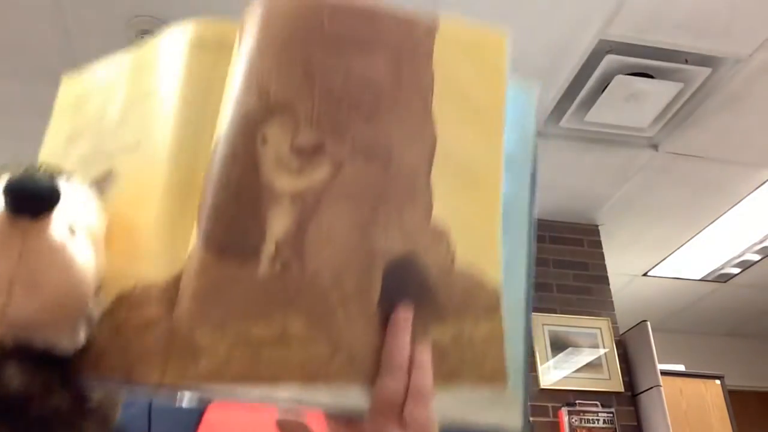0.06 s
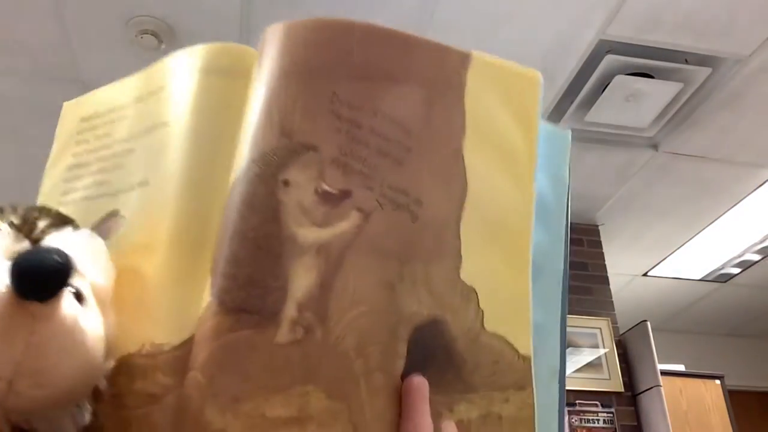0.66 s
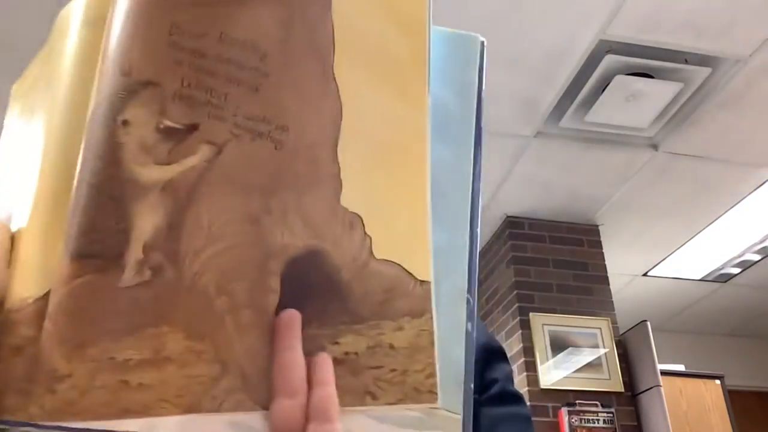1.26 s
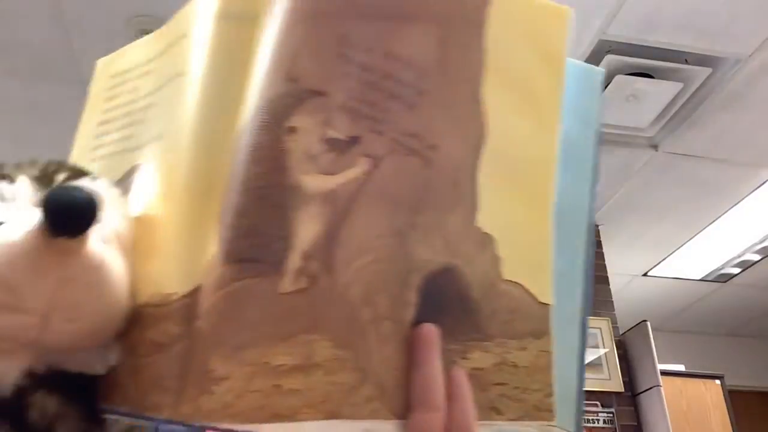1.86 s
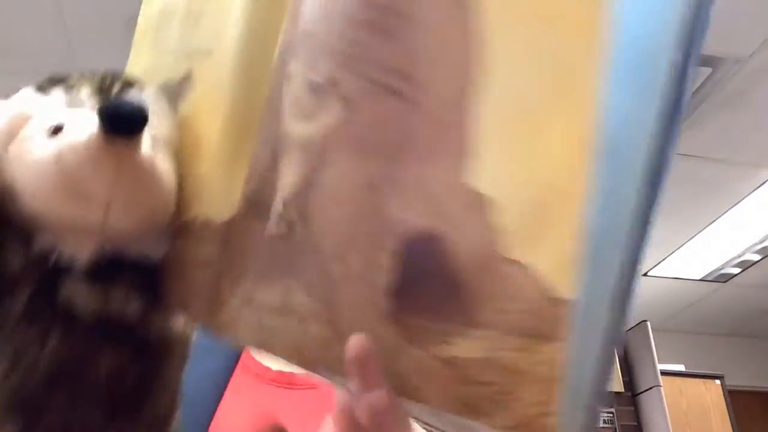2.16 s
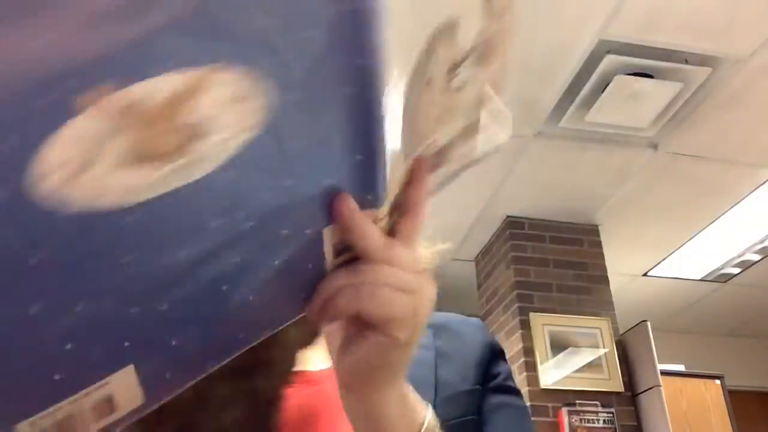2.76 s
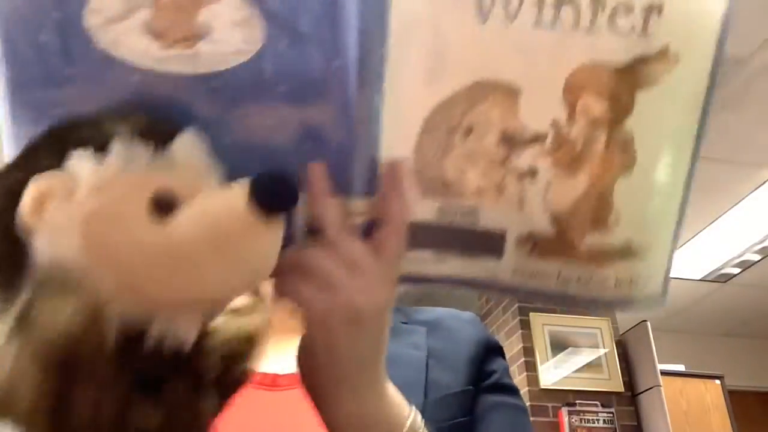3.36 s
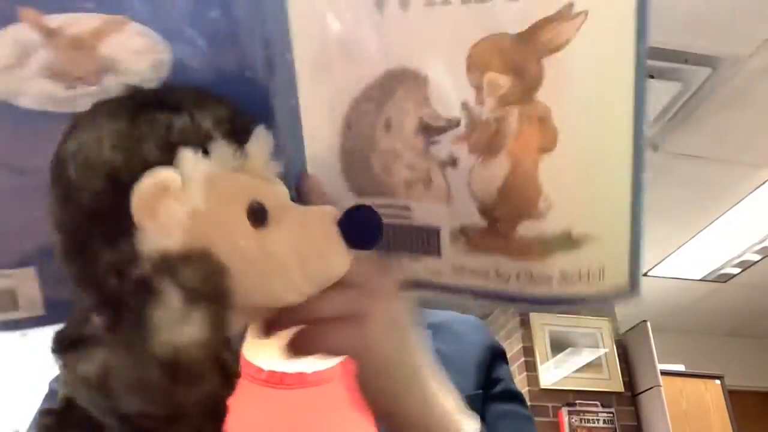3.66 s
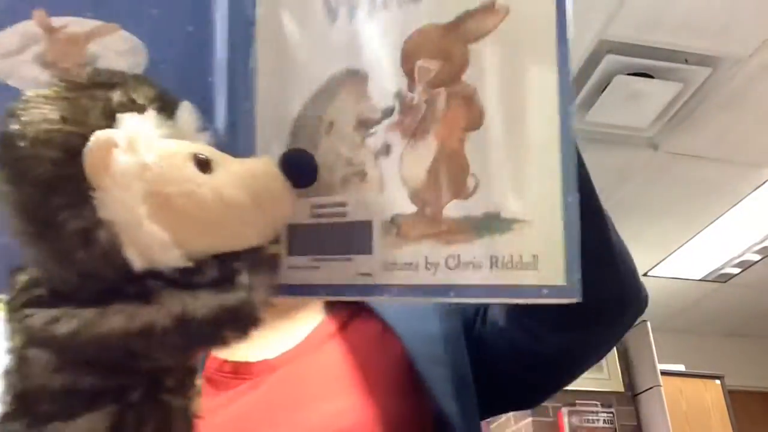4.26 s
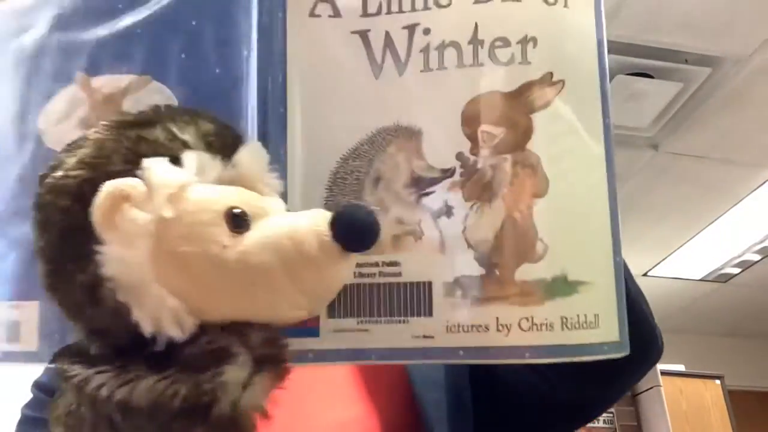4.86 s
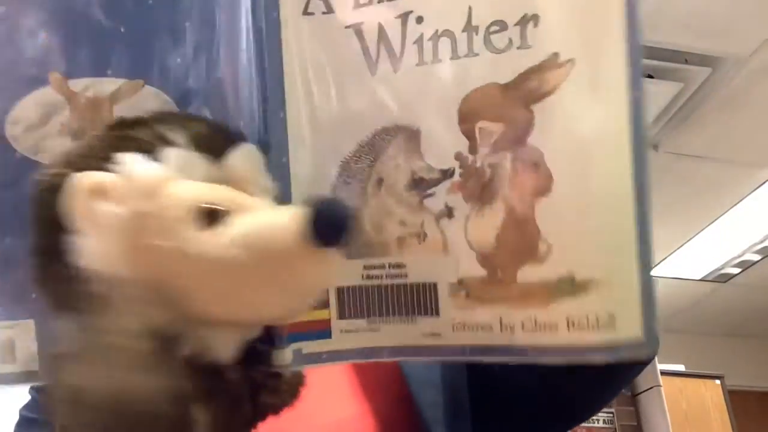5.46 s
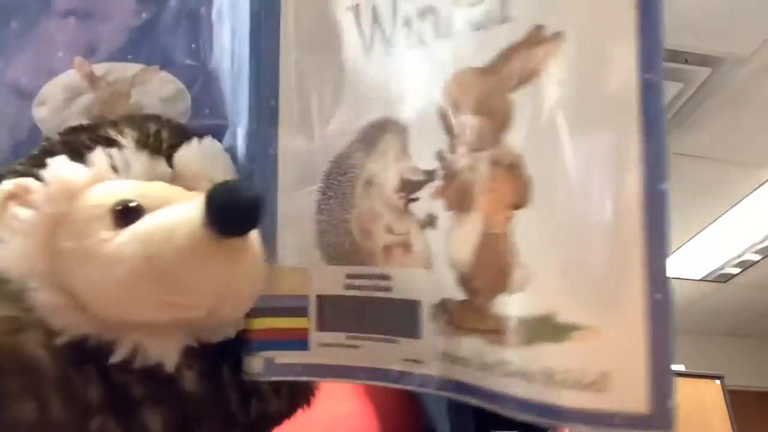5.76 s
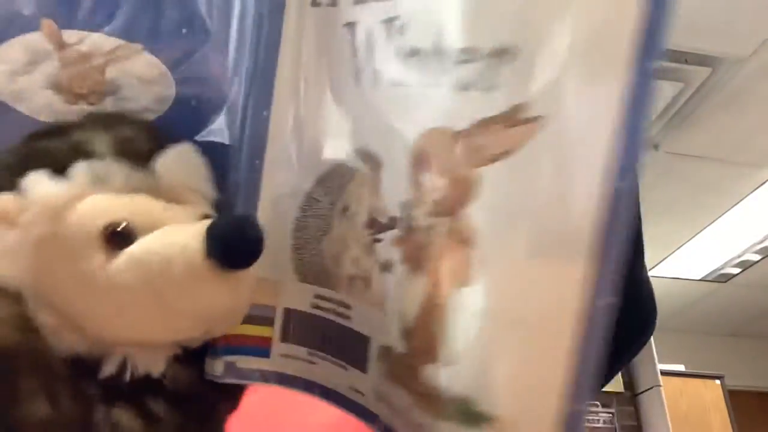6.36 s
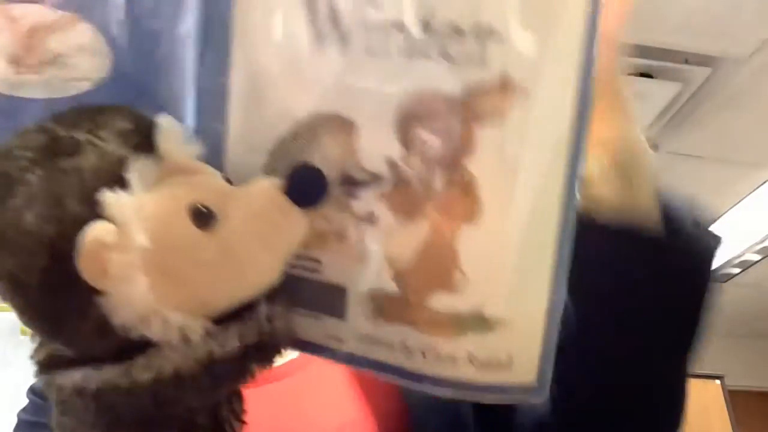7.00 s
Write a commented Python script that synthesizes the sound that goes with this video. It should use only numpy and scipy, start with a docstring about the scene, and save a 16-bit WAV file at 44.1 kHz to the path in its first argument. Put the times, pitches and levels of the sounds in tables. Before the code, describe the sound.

Over a faint rumble of ventilation and the hum of ceiling lights, a plastic-covered book gives a few light ticks and bumps. As it is turned around close to the microphone, the jacket buckles in irregular sharp snaps and fine crackle. A hand makes one longer hissing slide, followed by louder snaps, short brushes and dull knocks on the covers. One tiny finger squeak comes just before the end.

```python
"""A picture book in a clear plastic jacket is handled close up, over ventilation and a faint light hum.
At first it is held up with the jacket facing away: a few small, roomy snaps and soft bumps.
From about 2 s it is closed and turned round: the film buckles in sharp snaps and fine crackle, hands
and a plush puppet rub over it, and the stiff boards knock dully. A hand makes one long slide at 3.5 s,
the snaps grow louder, and a finger squeaks on the plastic just before the end."""
import sys
import numpy as np
from scipy import signal
from scipy.fft import rfft, irfft
from scipy.io import wavfile
from scipy.ndimage import uniform_filter1d

SR = 44100
rng = np.random.default_rng(int(sys.argv[2]) if len(sys.argv) > 2 else 0)


def master_out(mix):
    """Clip the mix to full scale and print it as 16-bit PCM to the path in sys.argv[1]."""
    frames = np.transpose(np.atleast_2d(mix))
    ceiling = np.clip(frames, -1, 1)
    pcm = np.round(ceiling * 32767).astype(np.int16)
    wavfile.write(sys.argv[1], SR, pcm)


N = 314433
TIME = np.arange(N) / SR
TURN_S = 2.05   # the book starts to turn


def from_db(db):
    """Decibels to gain."""
    return 10 ** (np.asarray(db) / 20)


def unit_rms(x):
    """Scale to an rms of 1."""
    return x / np.sqrt(np.mean(x ** 2) + 1e-20)


def band(x, low_hz, high_hz, order=3):
    """Butterworth band-pass."""
    return signal.sosfilt(signal.butter(order, [low_hz, high_hz], "band", fs=SR, output="sos"), x)


def colour(x, spectrum):
    """Shape a texture with a smooth EQ curve; rms 1."""
    hz, db = np.transpose(spectrum)
    bin_hz = np.maximum(np.arange(N // 2 + 1) * SR / N, 1)
    curve_db = np.interp(np.log(bin_hz), np.log(hz), db)
    return unit_rms(irfft(rfft(x) * from_db(curve_db), N))


def drift(per_s):
    """A random wander that takes a new course per_s times a second; rms 1."""
    knots = np.arange(0, N / SR + 1, 1 / per_s)
    return unit_rms(np.interp(TIME, knots, rng.standard_normal(len(knots))))


def ring(x, hz, t60):
    """One damped mode: a unit click sets a sine of height 1 ringing."""
    r, w = from_db(-60 / (t60 * SR)), 2 * np.pi * hz / SR
    return signal.lfilter([0, np.sin(w)], [1, -2 * r * np.cos(w), r * r], x + 1e-18)


def grain_energy(per_s, spread_db, max_spreads, decay_s):
    """Energy envelope of tiny random releases of uneven size, each dying away fast."""
    sizes = from_db(spread_db * np.minimum(rng.exponential(1, N), max_spreads))
    grains = sizes * (rng.random(N) < per_s / SR)
    return signal.lfilter([1], [1, -np.exp(-1 / (decay_s * SR))], grains ** 2 + 1e-18)


def place_hits(sounds, starts_s, levels_db, edges_hz, attack_samples):
    """Set the attack of each hit to its level in every band, then lay the hits on the timeline."""
    shaped, track = 0, np.zeros(N)
    for low, high, level_db in zip(edges_hz, edges_hz[1:], levels_db):
        part = band(sounds, low, high)
        gain = from_db(level_db) / part[:, :attack_samples].std(axis=1)
        shaped = shaped + part * gain[:, None]
    for start, hit in zip(starts_s, shaped):
        at = int(start * SR)
        track[at:at + len(hit)] += hit[:N - at]
    return track


# The room tone, heaviest around 100 Hz. Each row: frequency in Hz, relative level in dB.
VENT_SPECTRUM = [(25, -21), (50, -15), (78, -0.5), (110, -1), (160, -18), (300, -15.5), (480, -19),
                 (700, -30), (1100, -36.5), (1800, -39), (3000, -41), (9000, -44), (16000, -48)]


def background(vent_db=-61, hum_hz=120, hum_db=-62.0):
    """Ventilation rumble and the wavering hum of the ceiling lights."""
    vent = from_db(vent_db) * colour(rng.standard_normal(N), VENT_SPECTRUM)
    hum = from_db(hum_db + 1.4 * drift(15)) * np.sin(2 * np.pi * hum_hz * TIME)
    return vent + hum


def room(x, early_db=-13.5, early_s=0.0029, tail_db=-16.5, t60=0.23, treble_db=-23.0, treble_t60=0.18):
    """Echoes from the reader and the desk, then a short diffuse tail that dulls as it dies."""
    t = np.arange(SR // 2) / SR
    noises = rng.standard_normal((3, len(t))) * (1 - np.exp(-(t / 0.0031) ** 2))
    decays_s = (early_s, t60 / np.log(1000), treble_t60 / np.log(1000))
    early, late, treble = [unit_rms(noise * np.exp(-t / decay)) / np.sqrt(len(t))
                           for noise, decay in zip(noises, decays_s)]
    tail = band(late, 120, 3600, order=1) + from_db(treble_db) * band(treble, 3200, 13550, order=1)
    return signal.fftconvolve(x, from_db(early_db) * early + from_db(tail_db) * tail)[:N]


def stroke_db(start, end, swell_db_per_s=526, fade_db_per_s=258):
    """Envelope of one stroke: it swells up to its start, holds, and dies away after its end."""
    return -swell_db_per_s * np.maximum(start - TIME, 0) - fade_db_per_s * np.maximum(TIME - end, 0)


# One long hand slide over the jacket, speeding up, then stopping. Each row: time in seconds, level in
# dB before the film and paper trims.
HAND_SLIDE = [(3.489, -54.5), (3.6, -58.5), (3.7, -55), (3.775, -42.5), (3.84, -47.5), (3.9, -57),
              (3.99, -81.5)]
# Short brushes of a hand or the puppet. Each row: start in seconds, hold in seconds, film hiss in dB,
# paper rub in dB.
BRUSH_STROKES = [(0.047, 0.041, -75, -78), (0.157, 0.057, -65, -64), (0.364, 0.017, -99, -76),
                 (0.53, 0.006, -71.5, -74), (2.056, 0.06, -71.5, -62.5), (2.146, 0.028, -52, -52.5),
                 (2.233, 0.057, -51.5, -58.5), (2.326, 0.021, -55.5, -56.5), (2.404, 0.21, -57.5, -68),
                 (2.46, 0.073, -53, -73), (2.618, 0.18, -54.5, -61.5), (2.886, 0.0287, -62, -60),
                 (3.181, 0.13, -71, -76.5), (3.298, 0.074, -63, -71), (3.375, 0.068, -57.5, -61),
                 (3.94, 0.15, -87, -66), (4.068, 0.09, -68.5, -65.5), (4.166, 0.024, -61.5, -56),
                 (4.284, 0.05, -62, -63), (4.346, 0.1, -54, -60.5), (4.493, 0.19, -60.5, -65.5),
                 (4.755, 0.045, -72.5, -69), (4.85, 0.06, -68.5, -69), (4.96, 0.063, -66.5, -65),
                 (5.111, 0.012, -67, -63), (5.298, 0.068, -55.5, -69), (5.404, 0.17, -65, -61),
                 (5.686, 0.052, -63, -69), (5.8, 0.097, -65, -64.5), (5.944, 0.065, -52, -56.5),
                 (6.056, 0.096, -57, -55.5), (6.227, 0.15, -59, -61.5), (6.38, 0.067, -62.5, -59),
                 (6.504, 0.29, -58.5, -56.5), (6.811, 0.051, -74.5, -60), (6.97, 0.03, -88, -68.5)]


def handling(film_trim_db=2, paper_trim_db=-4, creep_film_db=-82.5, creep_paper_db=-80.5):
    """How hard film and paper are rubbed at each moment, in dB: the strongest contact leads."""
    times, levels_db = np.transpose(HAND_SLIDE)
    slide = np.interp(TIME, times, levels_db) + stroke_db(times[0], times[-1])
    creep = stroke_db(TURN_S, TIME[-1])   # the grip keeps creeping once the book turns
    film_db = np.maximum(slide + film_trim_db, creep + creep_film_db)
    paper_db = np.maximum(slide + paper_trim_db, creep + creep_paper_db)
    for start, hold, hiss_db, rub_db in BRUSH_STROKES:
        shape = stroke_db(start, start + hold)
        film_db = np.maximum(film_db, hiss_db + shape)
        paper_db = np.maximum(paper_db, rub_db + shape)
    return film_db, paper_db


def friction(level_db, spectrum, slips_per_s, spread_db, smooth_db, clump_db, grain_s):
    """Clumps of stick-slip grains over a smooth hiss; a light touch only hisses."""
    energy = grain_energy(slips_per_s, spread_db, max_spreads=4, decay_s=grain_s)
    texture = np.sqrt(energy / energy.mean() + from_db(smooth_db) ** 2)
    grip = unit_rms(texture * from_db(clump_db * drift(45)))
    sticking = np.clip((level_db + 78) / 10, 0, 1)   # smooth below -78 dB, fully grainy above -68 dB
    force = np.sqrt(sticking * grip ** 2 + 1 - sticking)
    return from_db(level_db) * colour(force * rng.standard_normal(N), spectrum)


# Three colours of rubbing: bright film, midrange paper, low board drag.
# Each row: frequency in Hz, relative level in dB.
FILM_SPECTRUM = [(2000, -10.5), (3500, -1.5), (5500, -7.5), (8000, 0), (10800, -1), (13000, -2.5),
                 (16000, -6)]
PAPER_SPECTRUM = [(500, -7), (1000, -6.5), (1600, -2.5), (2200, -6), (2900, -4.5), (3800, -8.5),
                  (8000, -18.5)]
DRAG_SPECTRUM = [(120, -7), (250, -1), (450, -2.5), (700, -7.5), (1000, -10), (2000, -54)]


def rubbing(film_db, paper_db):
    """Film slides with a grainy hiss; paper and cloth rub lower and smoother, and drag on the boards."""
    film = friction(film_db, FILM_SPECTRUM, slips_per_s=500, spread_db=6.5,
                    smooth_db=-2.0, clump_db=3.0, grain_s=0.0013)
    paper = friction(paper_db, PAPER_SPECTRUM, slips_per_s=460, spread_db=4.5,
                     smooth_db=-1.5, clump_db=4.0, grain_s=0.002)
    drag_db = -63 + 0.55 * (paper_db + 58)   # the boards rumble along with the rub
    drag = from_db(drag_db) * colour(rng.standard_normal(N), DRAG_SPECTRUM)
    return film + paper + drag


def finger_squeak(at_s=6.855, width_s=0.016, hz=650, level_db=-51.0, waver=0.0595, rough_db=5.0):
    """A finger sticks and slips on the plastic in one short, unsteady note."""
    phase = 2 * np.pi * np.cumsum(hz * (1 + waver * drift(200))) / SR
    envelope = np.exp(-((TIME - at_s) / width_s) ** 2)
    return from_db(level_db + rough_db * drift(250)) * envelope * np.sin(phase)


# The dull ring of the covers. Each row: frequency in Hz, relative gain in dB, seconds to fall 60 dB.
COVER_MODES = [(234, 0, 0.031), (334.6, -1.5, 0.03), (511.6, 5, 0.036), (619, 6, 0.021), (771, 1, 0.029),
               (865, -4, 0.07), (1035, -17.5, 0.05), (1490, -4, 0.054), (2000, -2, 0.03),
               (2780, -8.5, 0.026)]
# Hands, pages and the puppet bump the boards. Each row: start in seconds, mid level in dB, bass and
# treble in dB relative to the mids, contact time in seconds.
BOARD_BUMPS = [(0.939, -62, 4.5, -19, 0.003), (1.71, -61.5, 7, -13, 0.014), (2.096, -62, 6, -20, 0.006),
               (2.142, -50.5, -17, -6, 0.006), (2.486, -66, 5.5, -6, 0.006), (2.648, -54, -1, -1.5, 0.004),
               (2.893, -68, 13.5, -6, 0.004), (2.982, -47, 0.5, -12.5, 0.016), (3.225, -62, 4, -9, 0.035),
               (4.189, -51, -2, -11, 0.018), (4.371, -46.5, -11, -3, 0.02), (4.403, -51.5, -7, -18, 0.012),
               (4.451, -47.5, -28, -14, 0.002), (5.357, -58, 4, -18, 0.012), (5.412, -50, -2, -12, 0.003),
               (5.444, -48.5, -3.5, 2.5, 0.005), (5.95, -50, -7, -14, 0.008),
               (5.972, -43.5, -9.5, -14.5, 0.012), (6.085, -40, -0.5, -1.5, 0.002),
               (6.092, -34, -16, -16, 0.0024), (6.263, -52, -19, -7, 0.004), (6.382, -49.5, -9, -20, 0.008),
               (6.507, -43.5, -5, 5, 0.003), (6.597, -43.5, -0.5, -1, 0.003), (6.622, -47.5, -4, -4, 0.004)]


def board_knocks(settle_db=-18.0, settle_s=0.019, modes_db=-0.5):
    """A rough contact, short for a knuckle, long for plush, then pages settle; both shake the covers."""
    starts_s, mid_db, bass_db, treble_db, contact_s = np.transpose(BOARD_BUMPS)
    t = np.arange(8192) / SR
    force = np.exp(-t / contact_s[:, None]) + from_db(settle_db) * np.exp(-t / settle_s)
    bursts = rng.standard_normal(force.shape) * force
    covers = sum(from_db(db) * (-1) ** k * ring(bursts, hz, t60)
                 for k, (hz, db, t60) in enumerate(COVER_MODES))
    sounds = unit_rms(band(bursts, 160, 4800, order=1)) + from_db(modes_db) * unit_rms(covers)
    levels_db = (mid_db + bass_db, mid_db, mid_db + treble_db)
    return place_hits(sounds, starts_s, levels_db, edges_hz=(140, 380, 1100, 3000), attack_samples=880)


# The plastic voice of the bent jacket. Each row: centre in Hz, width in Hz, gain in dB.
JACKET_RESONANCES = [(1150, 2000, -5), (2980, 710, 1.5), (5480, 2300, 5), (7340, 1900, 7), (10220, 1400, 3),
                     (13200, 810, 1.5)]


def jacket_tone(x, direct_db=-11.5):
    """The jacket radiates through a few broad resonances; rms 1."""
    tone = from_db(direct_db) * x
    for hz, width, db in JACKET_RESONANCES:
        r, w = np.exp(-np.pi * width / SR), 2 * np.pi * hz / SR
        resonance = signal.lfilter((1 - r * r) / 2 * np.array([1, 0, -1]),
                                   [1, -2 * r * np.cos(w), r * r], x)
        tone = tone + from_db(db) * resonance
    return unit_rms(tone)


def jacket_crackle(film_db, trim_db=-7.5, grain_s=0.00078):
    """Small wrinkles let go at random, more often and more loudly the harder the film is worked."""
    per_s = np.interp(film_db, [-81, -74, -58, -42], [0, 25, 60, 160])
    energy = grain_energy(per_s, spread_db=4.5, max_spreads=2.5, decay_s=grain_s)
    return from_db(film_db + trim_db) * jacket_tone(np.sqrt(energy) * rng.standard_normal(N))


# Creases popping through. Each row: start in seconds, level of the 2.7-9 kHz crack in dB, body below
# it in dB relative to the crack, ring of the facet in Hz.
CREASE_POPS = [(0.167, -53, -0.5, 6540), (0.187, -46.5, -3, 8400), (0.2173, -49, -1, 7000),
               (0.51, -56.5, -1.5, 4960), (0.531, -61, -3, 5000), (0.5407, -53, -2.5, 6840),
               (0.68, -63.5, 3, 5860), (0.9871, -68.5, 6, 4320), (1.167, -79.5, 14.5, 2560),
               (1.7214, -66.5, -6, 6170), (2.019, -70, 8, 8900), (2.115, -61.5, 7, 9000),
               (2.2353, -50, -10, 9500), (2.384, -50.5, -22, 9440), (2.3916, -53, -24, 9200),
               (2.4111, -42.5, -20, 11700), (2.431, -44, -30, 8100), (2.5072, -52.5, -5.5, 8400),
               (2.6006, -47, -9, 7200), (2.7052, -46, -15, 11700), (2.749, -47, -12, 13100),
               (2.7682, -41.5, -17, 9700), (2.781, -39.5, -11, 5100), (2.8248, -53.5, -4, 7800),
               (2.9032, -36, -22, 5200), (2.943, -54.5, 1, 9800), (3.292, -60.5, 3.5, 5960),
               (3.3855, -42.5, -4.5, 6760), (3.486, -56, 6, 7800), (3.5417, -38, -6.5, 10800),
               (3.5714, -36.5, -15, 10700), (3.6141, -43.5, -2, 10800), (3.626, -50.5, 1, 9500),
               (3.739, -41, -3.5, 7000), (3.8455, -37.5, -7, 5400), (3.855, -43.5, -2.5, 6960),
               (3.9012, -38, -3, 7000), (3.9303, -48, -1, 9300), (4.3064, -44, -7.5, 9100),
               (4.336, -50.5, -14, 6500), (4.342, -36.5, -12.5, 10600), (4.3458, -27, -27, 8300),
               (4.3508, -33, -19, 7600), (4.3606, -38.5, -13, 8800), (4.3846, -42, -19, 2980),
               (4.441, -40, -21, 6500), (4.5017, -44, -29, 7600), (4.5428, -39, -6, 11100),
               (4.6042, -43, -11, 10700), (4.6183, -31, -18, 7930), (4.7808, -47, -14.5, 6760),
               (4.8642, -42.5, -19, 12200), (4.912, -54, -7.5, 7500), (4.9757, -34, -11, 7900),
               (5.1379, -55, -5.5, 10600), (5.211, -60.5, -10, 7100), (5.3136, -45.5, -6, 9500),
               (5.3159, -29.5, -12, 8400), (5.3232, -46, -31, 13000), (5.3463, -48.5, 6.5, 2600),
               (5.355, -32.5, -11.5, 10300), (5.4622, -50.5, -2, 6530), (5.4833, -52.5, -9, 6300),
               (5.515, -41, -7, 8700), (5.525, -33, -7, 7500), (5.5453, -38, -6, 9000),
               (5.6731, -35, -8.5, 7000), (5.683, -47, -6, 5640), (5.7989, -42, -2.5, 11600),
               (5.829, -39.5, -1.5, 9200), (5.843, -41, -5.5, 7600), (5.8893, -40, -9, 6500),
               (5.923, -47.5, -7, 7200), (5.9691, -44.5, 2.5, 9100), (6.0335, -35, -11, 9250),
               (6.05, -31.5, -10, 5900), (6.0837, -37.5, 2.5, 3230), (6.0953, -44.5, 4, 10100),
               (6.202, -48.5, -3.5, 5000), (6.2612, -44.5, -8.5, 8500), (6.3127, -42.5, -6.5, 8300),
               (6.3979, -49, -3, 6940), (6.504, -47, -1, 3000), (6.5785, -49, -4.5, 5500),
               (6.5966, -39, -2, 4930), (6.6625, -29, -21, 8000), (6.676, -43.5, -5, 5700),
               (6.69, -33, -16, 8500), (6.7192, -36.5, -8.5, 11000), (6.7293, -35, -28, 8000),
               (6.75, -37, -18, 9250), (6.764, -31, -12.5, 7400), (6.7746, -44.5, -7.5, 11100)]


def jacket_snaps(flip_s=0.00087, shiver_db=-6.0, shiver_s=0.0036, flutter_db=4.5, facet_db=-6.5):
    """A crease flips in about a millisecond with a dry, damped ring; the sheet shivers unevenly."""
    starts_s, crack_db, body_db, facet_hz = np.transpose(CREASE_POPS)
    t = np.arange(2048) / SR
    noise = rng.standard_normal((len(starts_s), 2, len(t)))
    flutter = unit_rms(uniform_filter1d(noise[:, 0], size=60, axis=1))
    flip = np.exp(-(t / flip_s - 1) ** 2)
    shiver = from_db(shiver_db + flutter_db * flutter) * np.exp(-t / shiver_s)
    bursts = noise[:, 1] * (flip + shiver)
    sounds = np.array([jacket_tone(burst) + from_db(facet_db) * unit_rms(ring(burst, hz, t60=0.0025))
                       for burst, hz in zip(bursts, facet_hz)])
    top_db = 9.5 * np.log2(facet_hz / 7950)   # a smaller facet rings higher and sheds more above 9 kHz
    levels_db = (crack_db + body_db, crack_db, crack_db + top_db)
    return place_hits(sounds, starts_s, levels_db, edges_hz=(520, 2700, 9000, 16500), attack_samples=220)


def scene(facing_away_send_db=10.5, boards_send_db=-0.5):
    """Mono mix. Until the book turns its jacket faces away, so more of it arrives by way of the room."""
    film_db, paper_db = handling()
    jacket = jacket_snaps() + jacket_crackle(film_db)
    boards = board_knocks() + finger_squeak()
    room_send = jacket * from_db(facing_away_send_db * (TIME < TURN_S)) + from_db(boards_send_db) * boards
    return (jacket + boards + room(room_send) + rubbing(film_db, paper_db) + background())[None]


def record(dry, low_cut_hz=42, high_cut_hz=15900):
    """The small microphone loses the deepest bass; the top is cut steeply."""
    thinned = signal.sosfilt(signal.butter(4, low_cut_hz, "high", fs=SR, output="sos"), dry)
    return signal.sosfilt(signal.ellip(8, .3, 70, high_cut_hz, fs=SR, output="sos"), thinned)


dry = scene()
out = record(dry)
master_out(out)
```